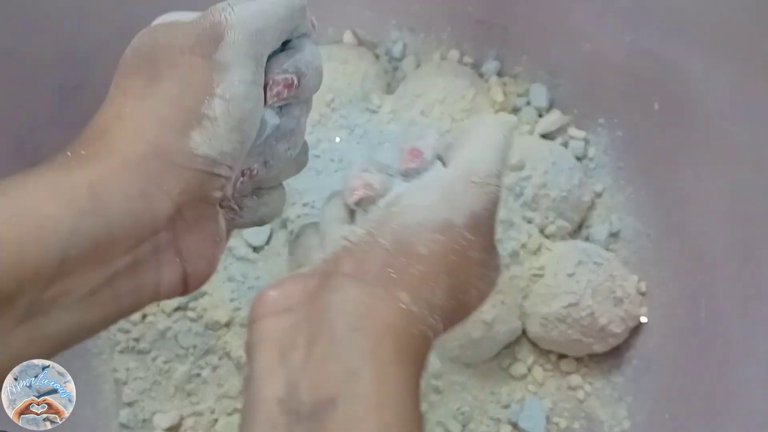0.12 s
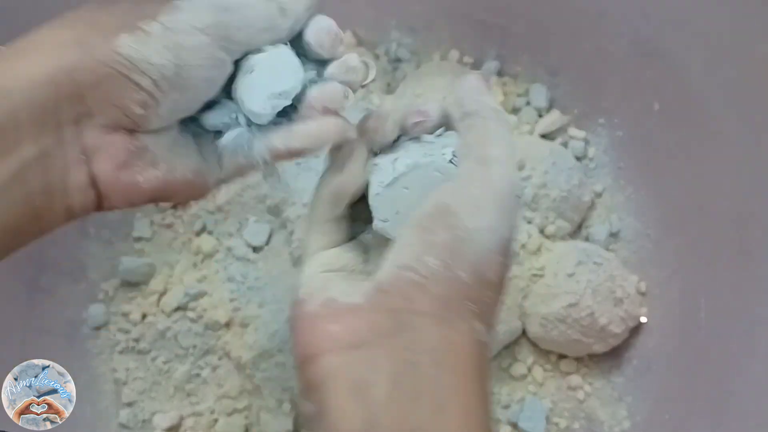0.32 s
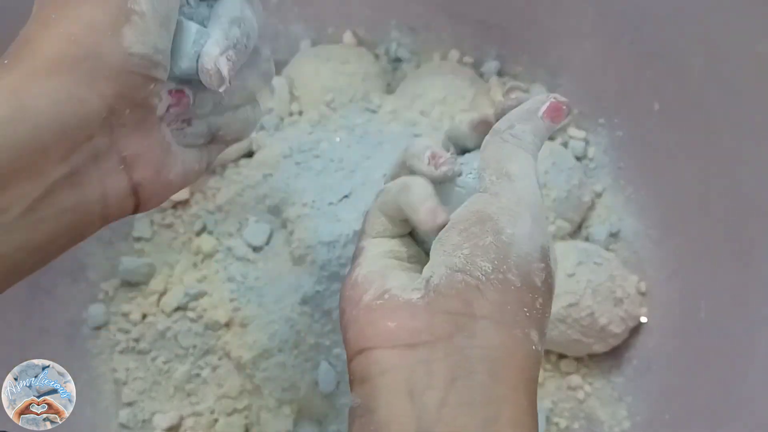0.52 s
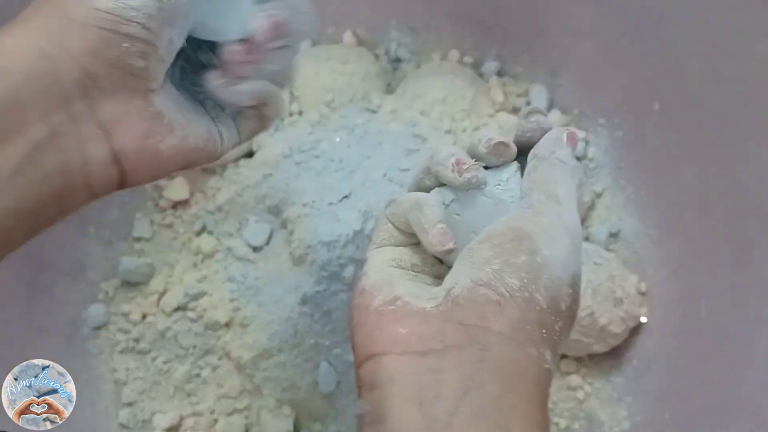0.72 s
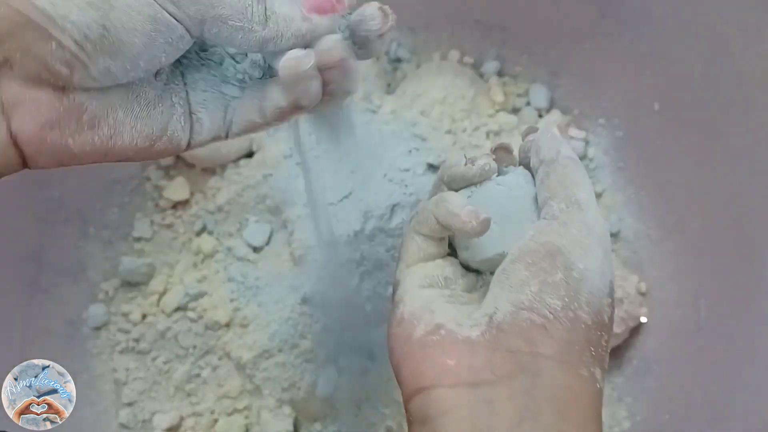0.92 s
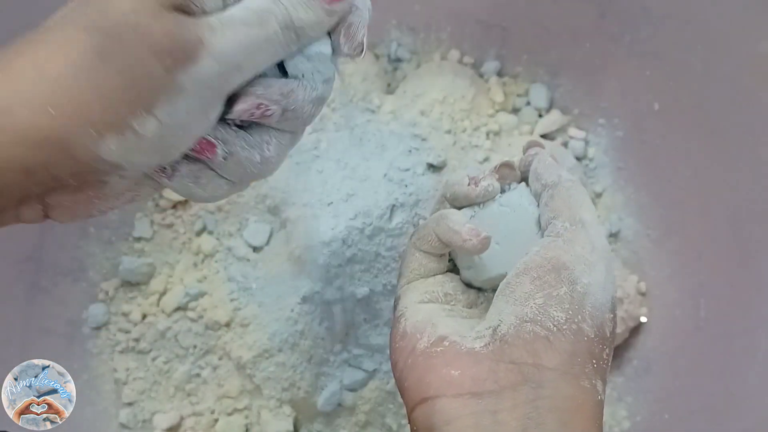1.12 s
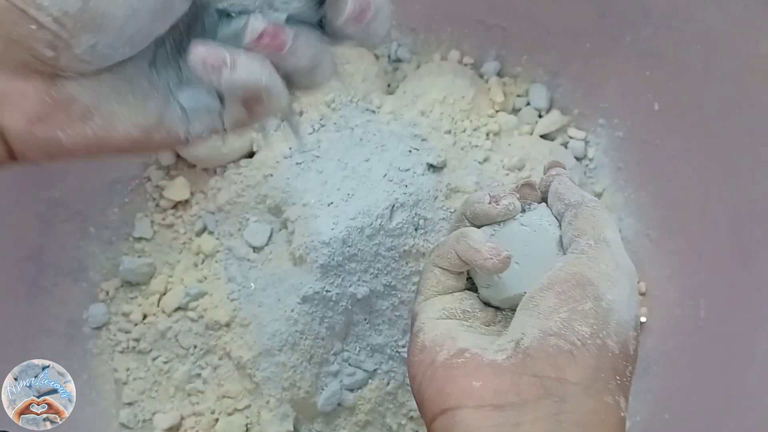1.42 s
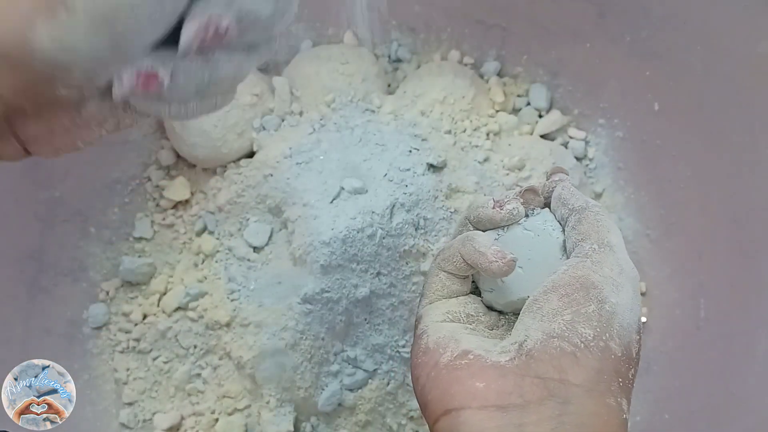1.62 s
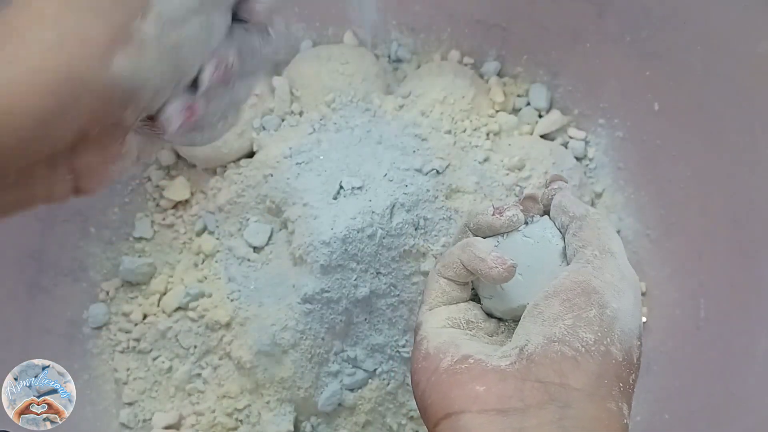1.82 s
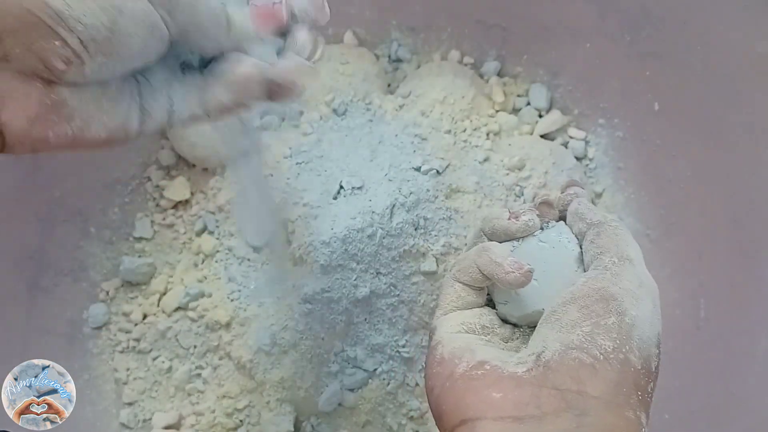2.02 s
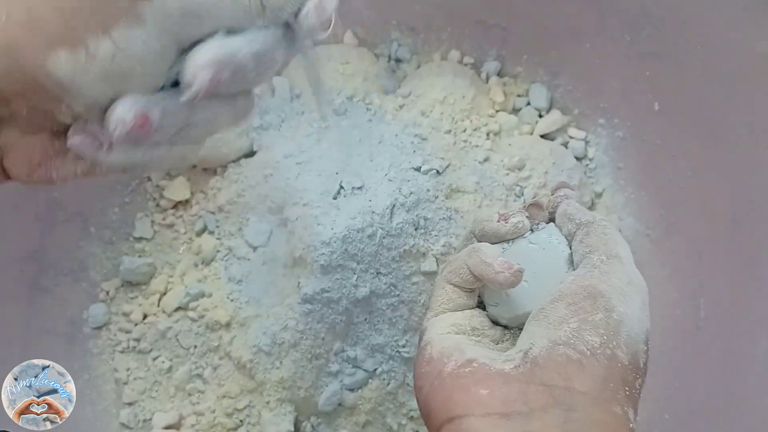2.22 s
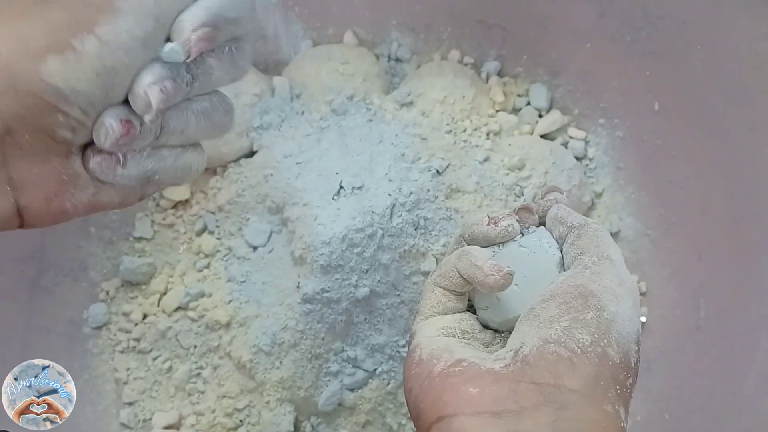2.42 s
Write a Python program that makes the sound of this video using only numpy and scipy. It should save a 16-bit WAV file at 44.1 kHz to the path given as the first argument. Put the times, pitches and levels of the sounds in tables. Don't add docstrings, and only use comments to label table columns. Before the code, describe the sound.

Crumbling dry chalk, close and nearly mono in a quiet room with a faint steady hum: one big crack early, light ticks and falling chips after, then busier sharp crackling with fine dusty hiss and dull bowl taps.

```python
import sys
import numpy as np
from scipy import signal
from scipy.fft import rfft, irfft
from scipy.io import wavfile
from scipy.ndimage import uniform_filter1d

SR = 44100
rng = np.random.default_rng(int(sys.argv[2]) if len(sys.argv) > 2 else 0)


def boost(x):
    u = np.asarray(x, float) / 20
    return 10 ** u


def generate_wav(sig):
    pcm = np.round(np.clip(np.atleast_2d(sig).T, -1, 1) * 32767).astype(np.int16)
    wavfile.write(sys.argv[1], SR, pcm)


N = 112455


def evened(x):
    return x / np.sqrt(np.mean(x ** 2) + 1e-20)


def add(mix, s, sound):
    part = mix[round(s * SR):][:len(sound)]
    part += sound[:len(part)]


def colour(x, points):
    f, db = np.transpose(points)
    hz = np.fft.rfftfreq(len(x), 1 / SR)
    gain_db = np.interp(np.log(hz + 1), np.log(f + 1), db)
    return irfft(rfft(x) * boost(gain_db), len(x))


def resonate(x, hz, wide_hz):
    r = np.exp(-np.pi * wide_hz / SR)
    return signal.lfilter([1, 0, -1], [1, -2 * r * np.cos(2 * np.pi * hz / SR), r * r], x)


def grit(per_s, spread_db, smooth):
    struck = rng.random(N) < per_s / SR
    size = boost(spread_db * np.minimum(rng.exponential(1, N), 4)) * struck
    puff = np.exp(-np.arange(200) / 50.0)
    shape = evened(signal.oaconvolve(size, puff)[:N])
    return evened((smooth + shape) * rng.standard_normal(N))


def breaks(rows, wide, rise_ms, tail_db):
    out, ms = np.zeros(N), np.arange(1500) / SR * 1000
    noises = rng.standard_normal((len(rows), len(ms)))
    for (s, db, hz, decay_ms), noise in zip(rows, noises):
        env = np.exp(-ms / decay_ms) + boost(tail_db) * np.exp(-ms / 16.0)
        burst = noise * env * np.minimum(ms / rise_ms, 1)
        burst = resonate(resonate(burst, hz, wide * hz), hz, 2 * wide * hz)
        add(out, s, boost(db) * burst / abs(burst).max())
    return out


# (time [s], peak level [dB], pitch [Hz])
CRACKS = [(0.0692, -29.5, 1240), (0.172, -22, 1030), (0.244, -11, 2040), (0.34, -24.5, 1620),
          (0.979, -29, 845), (1.035, -19, 2030), (1.6414, -30.5, 1210), (1.6693, -31, 1270),
          (1.839, -25, 3500), (1.8688, -21, 3650), (1.8765, -26, 3800), (1.921, -38, 1300),
          (1.72, -40, 1800), (1.994, -31.5, 2170), (2.171, -25.5, 2670), (2.2875, -16, 3330),
          (.887, -39.5, 1790), (.984, -31, 2180), (1.607, -37, 2300), (1.238, -44, 1800),
          (2.509, -38, 1110)]
# (time [s], peak level [dB], pitch [Hz],
# decay [ms])
CRUNCH = [(0.1944, -16.5, 1660, 4.8), (0.2, -8, 1640, 1.9), (0.2, -15.5, 4200, 1.2),
          (0.2026, -5.5, 2030, 1.3), (.2, -8, 820, 3.1), (.2068, -1, 1900, 1.5), (.2072, -8, 3500, 0.84),
          (0.207, -7, 9000, 0.24), (0.21, -2.5, 1260, 2.9), (.2108, -4, 6000, 1.8),
          (0.2135, -6.5, 1830, 1.4), (0.2114, -13, 15000, 1.7), (0.2478, -16, 1370, 2.8),
          (1.86, -7.5, 3400, 0.42), (1.8602, -17, 5800, 0.48), (2.1, -28, 2200, 1.4),
          (.5335, -29.5, 1660, 1.7), (1.0352, -22, 4450, 2.2)]


def cracks():
    decay_cycles = 2.6
    rows = [(s, db, hz, decay_cycles / hz * 1000) for s, db, hz in CRACKS]
    return breaks([*rows, *CRUNCH], wide=0.6, rise_ms=0.21, tail_db=-36)


# (time [s], peak level [dB], pitch [Hz])
SNAPS = [(0.0705, -17.5, 6840), (0.1708, -15.5, 5400), (0.179, -16, 5840), (0.3189, -20.5, 4800),
         (0.532, -14.5, 10400), (0.621, -20, 10300), (0.8543, -22, 7730), (0.9392, -22.5, 9600),
         (1.0766, -19, 7140), (1.1722, -17, 11100), (1.183, -19.5, 11100), (1.4445, -18.5, 9700),
         (1.4562, -22.5, 8400), (1.486, -18.5, 11300), (1.6708, -16, 9250), (1.8469, -15, 9300),
         (1.855, -17, 5500), (1.856, -11, 7300), (1.8684, -27, 7140), (1.9427, -13.5, 8000),
         (1.951, -23, 8650), (1.9662, -10.5, 7700), (2.0645, -19, 8500), (2.1036, -20.5, 5950),
         (2.171, -15.5, 6500), (2.439, -18, 8400), (2.509, -20.5, 6950),
         (0.2423, -19, 5140), (0.2484, -22, 6210), (0.4229, -24, 5360), (1.089, -23, 6550),
         (1.2331, -28, 4210), (1.32, -27, 11500), (1.3205, -28, 11500), (1.3209, -19.5, 8340),
         (1.3682, -31, 8690), (1.9869, -22, 10000), (2.0704, -18.5, 8400), (2.0834, -31, 9520),
         (2.103, -18.5, 5980), (2.1753, -21, 5470), (2.279, -17, 9100), (2.2863, -6.5, 9700),
         (2.5242, -28.5, 5100)]


def snaps():
    decay_ms = 0.7
    rows = [(*row, decay_ms) for row in SNAPS]
    return breaks(rows, wide=0.75, rise_ms=0.076, tail_db=-23)


# (frequency [Hz], t60 [s], soft level [dB], share of hardness [dB per dB])
BOWL = [(110, 0.11, -8, 0.044), (310.2, 0.028, 8, 0.114), (367.8, 0.082, 1.5, 0.075),
        (424.7, 0.032, 5.5, 0.63), (696, 0.043, -0.5, 0.95), (1100, 0.023, -5, 2.4)]
# (time [s], peak level [dB], hardness [dB])
KNOCKS = [(0.208, -9.5, 1), (0.242, -23, -1), (0.25, -18, -2.5), (0.532, -17.5, -4.5), (0.558, -26.5, 3),
          (0.655, -38.5, -1.5), (0.619, -25.5, -2), (0.882, -36, -5), (0.908, -30, -6), (0.946, -23.5, -2),
          (0.981, -26, 0), (1.034, -30.5, -19), (1.087, -35.5, -19), (1.311, -28, -12), (1.456, -29, -1),
          (1.511, -27.5, -10), (1.643, -29, 5.5), (1.67, -23, -8.5), (1.711, -25, -4.5), (1.839, -23, -12),
          (1.918, -27, -2), (1.969, -27, -29), (2.072, -28, -16), (2.171, -24.5, -12.5),
          (1.695, -35, -3), (1.722, -28, -6.5), (1.755, -36.5, -4), (1.802, -30.5, -16),
               (1.813, -28.5, -9), (1.858, -28.5, -9), (1.884, -35, -9), (1.949, -29, -8),
               (1.98, -28.5, -15), (2.037, -36, -4), (2.25, -29, -7), (2.312, -33.5, -6), (2.33, -37, -5),
               (1.846, -20.5, 3.5), (1.989, -29.5, -13), (2.153, -31, -7), (2.235, -24, -21),
               (2.266, -20, 0.5), (2.299, -28.5, 3), (2.514, -35, 0)]


def knocks():
    contact_s, level_spread_db, pitch_spread = 0.003, 4.5, 0.093
    rows, out, t = KNOCKS, np.zeros(N), np.arange(5000) / SR
    for (s, db, hard_db), places in zip(rows, rng.random((len(rows), len(BOWL), 2))):
        ring = np.zeros(len(t))
        for (hz, t60, soft_db, share), (a, b) in zip(BOWL, places):
            mode_db = soft_db + share * hard_db + level_spread_db * (a - 0.5)
            mode_hz = hz * (1 + pitch_spread * (b - 0.5))
            ring += boost(mode_db - 60 * t / t60) * np.sin(2 * np.pi * mode_hz * t + a)
        ring *= 1 - np.exp(-(t / contact_s) ** 2)
        add(out, s - 0.001, boost(db) * ring / abs(ring).max())
    return colour(out, [(60, -32), (100, 0)])


# (time [s], peak level [dB], pitch [Hz], t60 [s])
CHIPS = [(.2305, -21.5, 1250, 0.033), (.33, -29, 4200, .012), (.331, -23, 1236, .02),
         (.483, -37, 1120, 0.046), (.5335, -15.5, 726, 0.037), (.534, -35, 1820, .04),
         (.56, -27.5, 975, 0.029), (.58, -32, 1020, 0.024), (.59, -29, 1100, .03), (.887, -36, 710, 0.016),
         (.953, -26, 730, .03), (.984, -25.5, 745, 0.031), (1.0345, -27.5, 1880, 0.037),
         (1.092, -38, 2580, 0.066), (1.25, -47, 1745, 0.076), (1.14, -44.5, 1200, 0.028),
         (1.445, -33, 1003, 0.031), (1.487, -41, 1050, 0.03), (1.604, -43, 710, 0.027),
         (1.72, -33.5, 720, .03), (1.814, -38, 654, .03), (1.84, -27.5, 783, 0.035),
         (1.943, -38, 694, 0.037), (2.159, -33.5, 860, 0.022), (2.173, -33, 2800, .03),
         (2.211, -33.5, 2550, 0.042), (2.233, -36, 2550, 0.028), (2.233, -34, 3700, 0.018),
         (2.252, -31, 760, .03), (2.2873, -24.5, 1760, 0.028), (2.324, -33.5, 1700, 0.032),
         (2.345, -44, 1750, 0.035)]


def chips():
    rise_s, overtone_ratio, overtone_db, roughness = 0.00064, 1.13, -13.5, 0.3
    out, t = np.zeros(N), np.arange(5000) / SR
    for (s, db, hz, t60), noise in zip(CHIPS, rng.standard_normal((len(CHIPS), len(t)))):
        pair = np.sin(2 * np.pi * hz * t)
        pair += boost(overtone_db) * np.sin(2 * np.pi * overtone_ratio * hz * t)
        pair *= 1 + roughness * evened(uniform_filter1d(noise, size=70))
        add(out, s, boost(db - 60 * t / t60) * pair * (1 - np.exp(-t / rise_s)))
    return out


# (start [s], length [s], level [dB], pitch [Hz])
RUBS = [(0.066, 0.015, -34.5, 7700), (0.217, 0.05, -35.5, 6000), (0.215, 0.058, -31, 1160),
        (0.26, 0.071, -39.5, 1290), (0.36, 0.17, -52.5, 1290), (0.403, 0.1, -43.5, 6600),
        (0.656, 0.052, -44, 8100), (0.94, 0.069, -48, 8950), (1.084, 0.02, -33.5, 7000),
        (1.295, 0.048, -36.5, 8400), (1.636, 0.015, -32.5, 5800), (1.832, 0.063, -41, 6460),
        (1.834, 0.059, -39.5, 1700), (2.05, 0.09, -43, 7700), (2.277, 0.017, -28.5, 6900),
        (2.281, 0.053, -44.5, 1600)]


def rubs():
    out, sand = np.zeros(N), grit(900, 2.0, 0.8)
    for s, length, db, hz in RUBS:
        n = round(length * SR)
        hiss = sand[round(s * SR):][:n]
        hiss = evened(resonate(resonate(hiss, hz, 0.69 * hz), hz, 1.14 * hz))
        swell = np.sin(np.pi * np.arange(n) / n) ** 0.52
        add(out, s, boost(db) * hiss * swell)
    return out


# (time [s], sifting level [dB], squeezing level [dB], falling crumbs level [dB])
WORK = [(0, -44, -42.5, -49.5), (.13, -46, -59, -51), (.3, -41.5, -45.5, -55), (.5, -43, -52, -49.5),
        (.62, -43.5, -61, -51), (.83, -47, -60, -62.5), (.96, -38, -60.5, -39.5), (1.12, -42.5, -47.5, -55),
        (1.39, -46.5, -62, -56), (1.55, -40.5, -50, -50), (1.68, -43.5, -49.5, -48.5),
        (1.78, -43.5, -58, -49.5), (1.95, -42, -50, -47), (2.1, -41, -48.5, -50), (2.25, -41, -44.5, -46.5),
        (2.4, -43, -57.5, -54.5), (2.55, -46, -60, -48.5)]
# (frequency [Hz], gain [dB])
SIFT = [(2500, -30), (4200, -17), (5300, -5), (8000, 0), (11500, -3.5), (16000, -5.5)]
# (frequency [Hz], gain [dB])
SQUEEZE = [(300, 8), (700, -13), (1200, -0.5), (2400, -3), (4500, -0.5), (9000, -13.5)]


def powder():
    s, *levels_db = np.transpose(WORK)
    crumbs = grit(130, 0.87, 0.74)
    patter = sum(boost(db) * resonate(crumbs, hz, 5.0 / t60) for hz, t60, db, _ in BOWL[1:-1])
    fizz = colour(grit(300, 3.7, 1.07), SIFT)
    rustle = colour(grit(500, 2.4, 0.98), SQUEEZE)
    out = np.zeros(N)
    for layer, db in zip((fizz, rustle, patter), levels_db):
        out += evened(layer) * boost(np.interp(np.arange(N) / SR, s, db))
    return out


def jolts():
    s, *_, falling_db = np.transpose(WORK)
    low = resonate(resonate(rng.standard_normal(N), 108, 50), 101, 70)
    return evened(low) * boost(-3 + np.interp(np.arange(N) / SR, s, falling_db))


# (frequency [Hz], gain [dB])
AIR = [(15, -39), (25, -26.5), (145, -0.5), (200, 2.5), (405, -14.5), (463, -38), (3920, -44), (8140, -43),
       (16000, -35)]


def room():
    hum_hz, hum_db, flutter_db, flutter_wide_hz, air_db = 200.5, -39.5, -47, 36, -44
    flutter = resonate(rng.standard_normal(N), hum_hz, flutter_wide_hz)
    flutter = resonate(flutter, hum_hz, flutter_wide_hz)
    hum = boost(hum_db) * np.sqrt(2) * np.sin(2 * np.pi * hum_hz * np.arange(N) / SR)
    air = evened(colour(rng.standard_normal(N), AIR))
    return hum + boost(flutter_db) * evened(flutter) + boost(air_db) * air


# (frequency [Hz], side minus mid [dB])
SIDE_DB = [(30, -26), (70, -17.5), (110, -25.5), (200, -45.5), (500, -25), (2000, -32), (4500, -25),
           (14000, -16.5)]


def scene():
    mid = cracks() + snaps() + knocks() + chips() + rubs() + powder() + jolts() + room()
    wander = evened(uniform_filter1d(rng.standard_normal(N), size=150))
    side = colour(mid, SIDE_DB) * wander
    return np.array([mid + side, mid - side])


def band_limit(x):
    return signal.sosfilt(signal.butter(12, 16860, fs=SR, output="sos"), x)


# (frequency [Hz], gain [dB])
EDGE = [(15850, 0), (16050, -45)]


def record(dry):
    overloaded = np.tanh(dry)
    mix = np.array([colour(x, EDGE) for x in overloaded])
    return band_limit(mix)


dry = scene()
out = record(dry)
generate_wav(out)
```